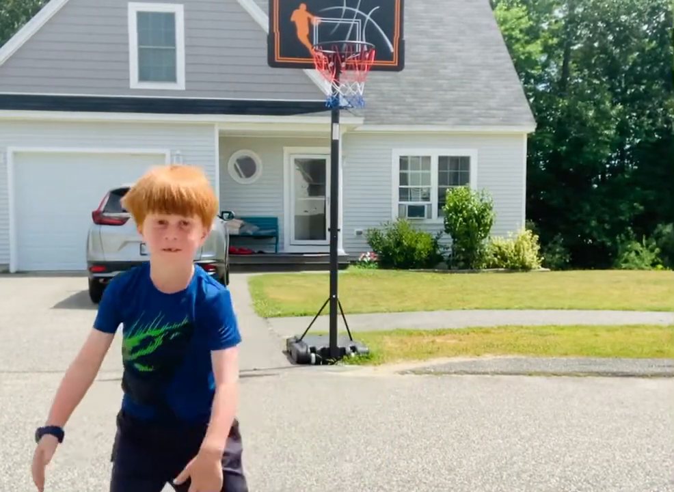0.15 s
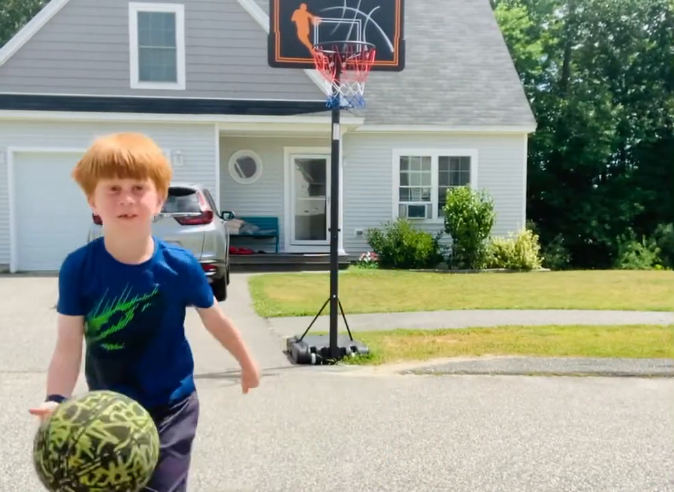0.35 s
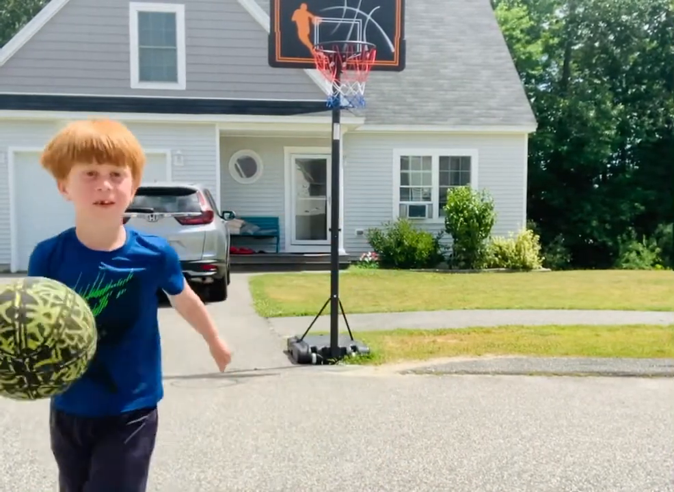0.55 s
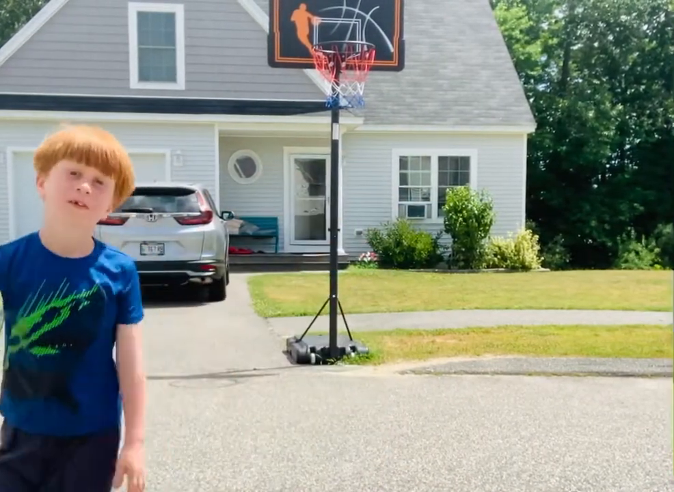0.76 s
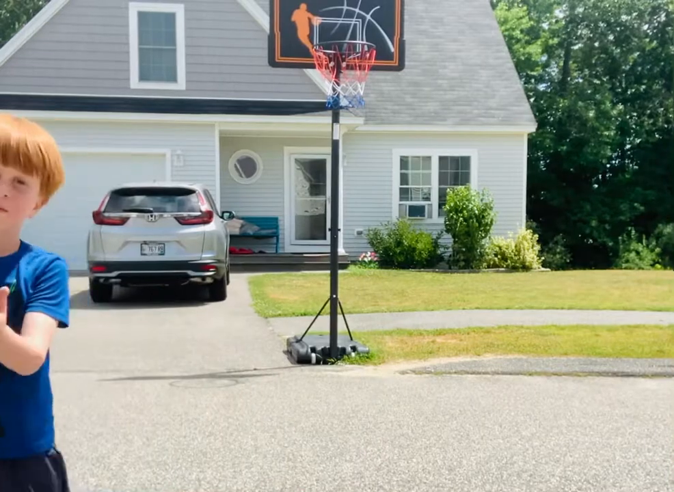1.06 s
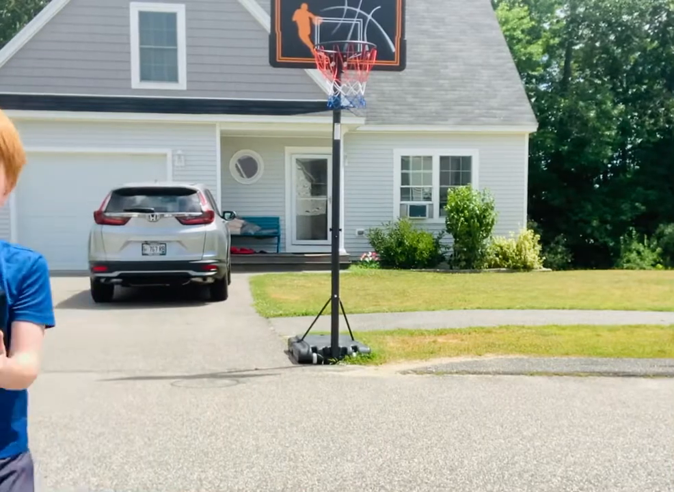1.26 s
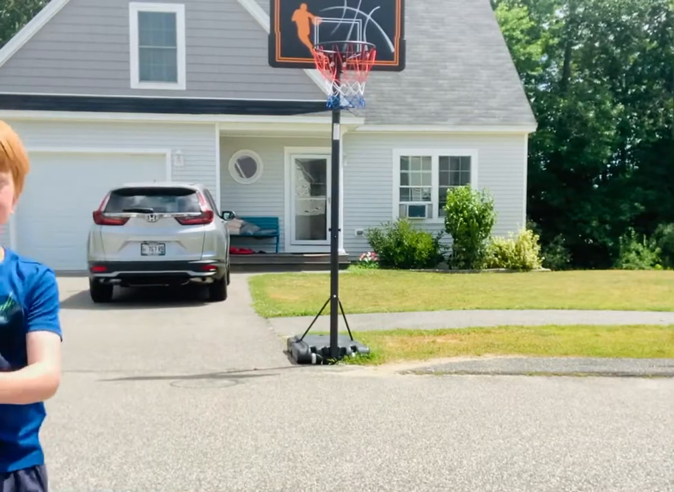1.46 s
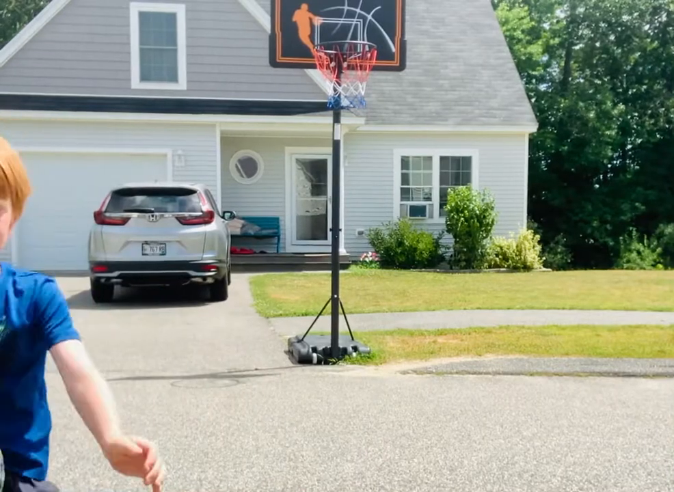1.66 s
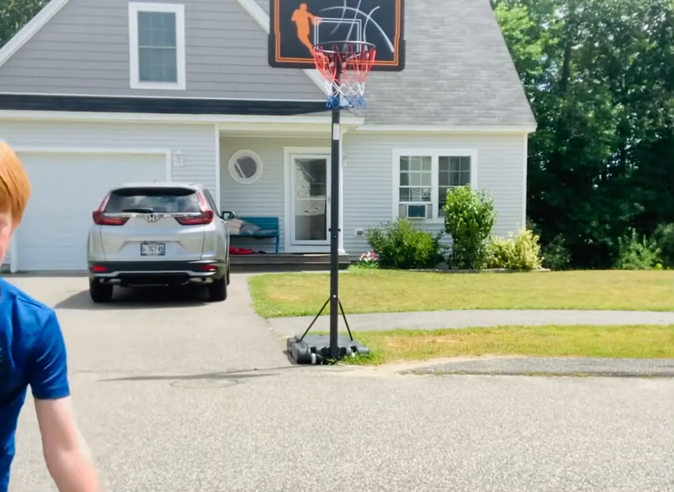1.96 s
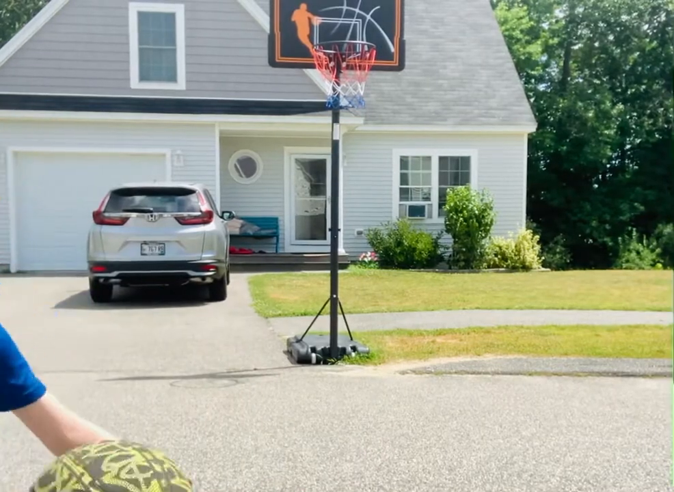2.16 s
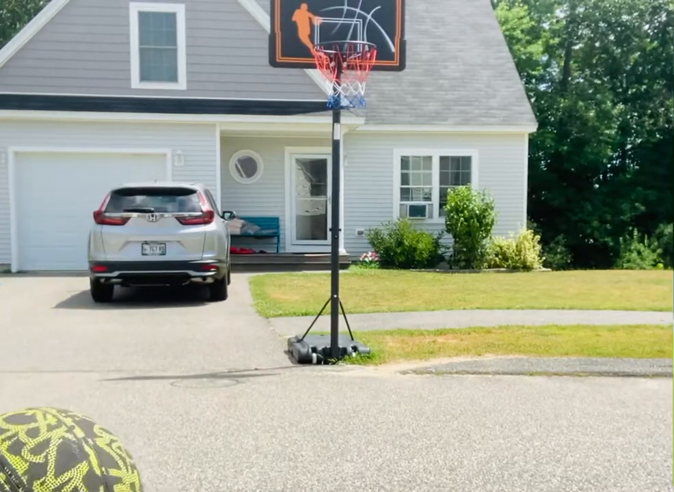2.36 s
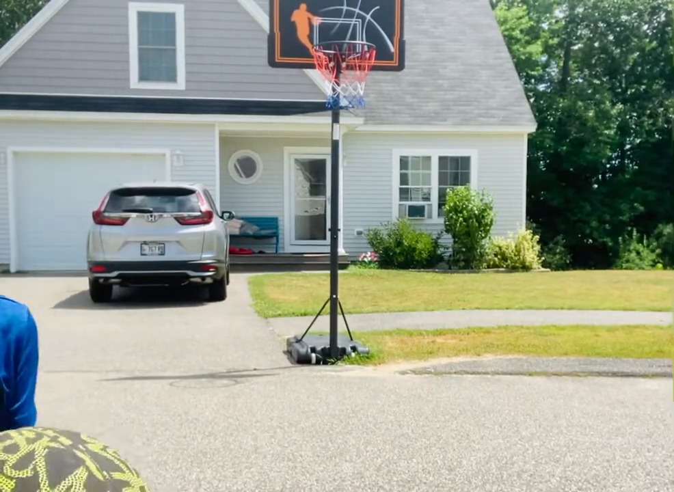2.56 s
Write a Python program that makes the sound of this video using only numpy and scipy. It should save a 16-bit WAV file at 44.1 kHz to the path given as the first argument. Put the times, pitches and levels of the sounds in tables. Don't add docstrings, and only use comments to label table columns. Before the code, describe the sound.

Basketball dribbled close by on outdoor paving: two sharp rubbery smacks, palm slaps, faint birds

```python
import sys
import numpy as np
from scipy import signal
from scipy.fft import rfft, irfft, next_fast_len
from scipy.io import wavfile
from scipy.ndimage import uniform_filter1d

SR = 44100
rng = np.random.default_rng(int(sys.argv[2]) if len(sys.argv) > 2 else 0)


def gain_from_db(level_db):
    decades = np.asarray(level_db, float) / 20
    return 10 ** decades


def inscribe(sig):
    pcm = np.round(np.clip(np.atleast_2d(sig).T, -1, 1) * 32767)
    wavfile.write(sys.argv[1], SR, pcm.astype(np.int16))


N = 119070

# frequency in Hz, density in dB per Hz.
STREET_HZ_DB = [(25, -3), (60, 1), (110, -5), (250, -15.5), (450, -19.5), (1000, -20), (4500, -30),
                (10300, -29.5), (12500, -42)]
# middle in seconds, length in seconds, level in dB, low band in Hz, upper bands in dB.
SCUFFS = [(0.065, 0.033, -52.5, 660, -21), (0.101, 0.024, -42, 900, -25), (0.115, 0.047, -45.5, 2900, -25),
          (0.156, 0.028, -46.5, 1220, -10.5), (0.863, 0.057, -56.5, 2520, -7), (0.904, .03, -59, 2440, -7),
          (1.13, 0.05, -48, 3170, -3), (1.57, 0.04, -48, 2490, 4.5), (1.612, 0.06, -58, 2150, -11),
          (1.99, 0.021, -47.5, 960, -26), (1.994, 0.026, -52.5, 1930, -28), (2.036, 0.055, -56, 930, -8),
          (2.134, 0.015, -45.5, 590, -14), (2.16, 0.023, -56, 537, -25), (2.197, 0.025, -47, 610, -31),
          (0.179, 0.008, -36, 2400, -14), (1.893, 0.01, -40, 2850, -11.5), (2.221, 0.046, -47.5, 2990, 0)]
# frequency in Hz, level in dB.
SCUFF_UPPER_HZ_DB = [(7000, -4), (10300, -2), (13600, -20)]
# start in seconds, level in dB, t60 in seconds, low bands in dB, middle bands in dB.
TAPS = [(0.064, -39, 0.019, 0, 2.5), (.093, -43, 0.032, -4, 1), (.109, -45, .02, -8.5, -8.5),
        (0.1828, -24, 0.0063, -41, -30), (0.1863, -27, 0.042, -40.5, -30), (0.208, -24, 0.0076, -2, -4),
        (0.2111, -20.5, 0.007, -8, -12.5), (.255, -44.5, 0.033, -11, 0), (0.4973, -36.5, 0.038, -20, -12),
        (.505, -40.5, 0.017, -11, -6), (.56, -28, 0.022, -22, -19), (0.567, -41, .01, -5, -6),
        (0.574, -42.5, 0.0082, -1, 1), (0.657, -36, 0.017, -28, -29), (1.0147, -25.5, 0.022, -12, -4.5),
        (1.1273, -17.5, 0.014, -11, -6), (1.1307, -22.5, 0.03, -8.5, -14), (1.3352, -40, 0.06, -5, 3),
        (2.0893, -6, 0.0081, -3, -7), (2.0909, -15, 0.028, 5, 1), (2.0973, -23, 0.0084, 17, 17.5),
        (2.123, -42, 0.03, 2, -10), (2.3977, -22.5, 0.04, -9, -9.5), (2.4018, -17.5, 0.045, -5, 1.5),
        (2.405, -13, 0.015, -11.5, -7.5), (2.416, -36, 0.042, -5, -8), (2.456, -40.5, 0.044, -10, -17),
        (2.666, -31, 0.012, -19, -15), (2.6772, -33, 0.0089, -27, -28), (2.6912, -24.5, 0.0066, -14, -11),
        (2.0929, -20.5, 0.0062, -3, -5), (1.133, -33.5, 0.022, -2.5, -4), (2.161, -47, 0.018, 5.5, -10)]
# centre in Hz, width in Hz, level in dB.
SKIN_BANDS = [(1275, 510, 8), (3000, 370, 3), (3720, 710, 2.8), (7550, 1240, 0.5), (9570, 1080, 3.5),
              (12000, 3800, -8.5)]
# middle in seconds, level in dB, frequency in Hz.
THUMPS = [(.508, -40, 720), (0.563, -43.5, 500), (1.0159, -31.5, 660), (1.0193, -32, 310),
          (1.3362, -34, 650), (1.34, -36, 278), (2.0922, -20.5, 414), (2.0959, -13, 284),
          (2.0998, -6.5, 663), (2.104, -16, 190), (2.1094, -27, 164), (2.651, -39, 197),
          (2.698, -40.5, 605)]
# start in seconds, level in dB, breathing modes in dB.
PALMS = [
    (2.404, -21, -1),
    (1.13, -35, -10.5),
    (2.7, -43, 5),
]
# frequency in Hz, level in dB, t60 in seconds.
HELD_MODES = [(443, 3, 0.12), (454.4, -2.5, 0.13), (577, -8.5, 0.097), (645, -3, 0.087), (707, -3, 0.055),
              (796, -14, .05), (270, -1.5, 0.044), (1114, 5, 0.036), (1193, -14, 0.024), (1393, 0.5, .04),
              (1496, -10, 0.06)]
# start in seconds, smack in dB, smack in Hz, squash in dB, lift-off in dB.
BOUNCES = [
    (0.168, 1, 1670, -9.5, -5),
    (1.88, -6, 1868, -12, 6.5),
]
# frequency in Hz, level in dB over the squash, t60 in seconds.
SMACK_OVERTONES = [(918, -3.5, 0.023), (2030, 8.5, 0.0035), (3380, -1, 0.011), (4570, -10, 0.0059),
                   (5060, -20, 0.0058), (7280, -4, 0.0061), (9160, -23, 0.0085)]
# frequency in Hz, level in dB, t60 in seconds.
CAVITY_MODES = [
    [(421.6, -25, 0.11), (447.7, -26.5, 0.12), (561, -25, 0.077), (880, -34, 0.066), (1056, -32, 0.13),
     (1820, -42, 0.095), (2400, -46.5, 0.27), (2930, -44, 0.092)],
    [(428.2, -18.5, 0.12), (444.2, -24.5, 0.13), (570, -28.5, 0.096), (743, -27, 0.052), (876, -38, 0.039),
     (1082, -34, .17), (1470, -35, 0.06), (2400, -73, 0.35)],
]
# frequency in Hz, level in dB, t60 in seconds.
PING_MODES = [(2396, -44, .6), (3157, -53, 1.2)]
# level in dB, lowpass in Hz.
ECHOES = [(-39, 2500), (-20, 240)]
# start in seconds, length in seconds, start frequency in Hz, level in dB.
CHIRPS = [(.312, .04, 4200, -66), (.552, .028, 4300, -63), (.935, .045, 4600, -65),
          (2.275, .035, 4200, -62), (2.535, .024, 4850, -58), (2.561, .016, 3950, -61),
          (2.672, .018, 4900, -59)]
# start in seconds, length in seconds, frequency in Hz, level in dB.
WHISTLES = [(1.39, .26, 5620, -64), (1.42, .21, 5950, -67), (1.15, .2, 5700, -72), (2.25, .085, 7550, -62),
            (2.61, .02, 1750, -61)]

STREET_DB, GUST_DB = -52.5, 1.43
TICK_DB, TICK_HZ, TICK_T60_S, TICKS_PER_S = -59.5, 9300, 0.036, 45
SCUFF_WIDTH_RATIO, GRIT_DB = 0.38, 3
LOW_HZ, MIDDLE_HZ = 2000, 5000
SNAP_GAIN, TAP_LEAD_S = 3.4, 0.00014
TAP_TAIL_DB, TAP_TAIL_STRETCH = -12.5, 3.33
THUMP_CYCLES = 0.45
RISE_CYCLES = 4
SMACK_SAG_PER_MS, SMACK_RISE_S, SMACK_T60_S = 0.0236, 0.0007, 0.016
CRACK_DB, CRACK_T60_S = -3.5, 0.014
FIRST_DIP_S, DIP_STRETCH = 0.003184, 2.199
SQUASH_PEAK_S, SQUASH_FADE_POWER = 0.011, 2.28
SQUASH_OVERTONE, OVERTONE_LAG_RAD = 0.54, 0.27
FREE_S = 0.009
LIFT_S, LIFT_HZ, LIFT_T60_S, LIFT_RISE_S = 0.0096, 1410, 0.03, 0.00039
PING_WAVER_RAD = 0.03
YARD_DB, YARD_HZ, YARD_T60_S = -39, 1500, 0.25
BOOM_DB, BOOM_HZ, BOOM_T60_S = -37.5, 133, 0.72
YARD_RISE_S, ECHO_S, ECHO_T60_S = 0.022, 0.107, 0.011
CHIRP_FALL_HZ_PER_S = 26000
BIRD_DB, FLUTTER_DB, BIRD_DRIFT_RAD = -4, 4, 0.012
MIC_HZ, TOP_HZ = 75, 15900


def unit(x):
    return x / np.sqrt(np.mean(x ** 2) + 1e-20)


def filtered(x, response):
    m = next_fast_len(x.shape[-1] + 8192)
    spectrum = rfft(x, m) * response(np.fft.rfftfreq(m, 1 / SR))
    return irfft(spectrum, m)[..., :x.shape[-1]]


def peak(f, hz, width_hz):
    return 1j * f * width_hz / (hz * hz - f * f + 1j * f * width_hz)


def add(out, s, x):
    part = out[max(round(s * SR), 0):][:len(x)]
    part += x[:len(part)]


def decay(t, t60_s):
    return gain_from_db(-60 * t / t60_s)


def dying(t, hz, t60_s):
    return decay(t, t60_s) * np.sin(2 * np.pi * hz * t)


def street():
    hz, db = np.transpose(STREET_HZ_DB)
    z = signal.stft(rng.standard_normal(N + 600), nperseg=512)[2]
    patches = uniform_filter1d(rng.standard_normal(z.shape), 8, 0)
    patches = unit(uniform_filter1d(patches, 10, 1))
    gust_db = GUST_DB * patches / (1 + np.arange(len(z))[:, None] / 40)
    noise = signal.istft(z * gain_from_db(gust_db), nperseg=512)[1][:N]
    air = unit(filtered(noise, lambda f: gain_from_db(np.interp(np.log(f + 1), np.log(hz + 1), db))))

    seeds = (rng.random(N) < TICKS_PER_S / SR) * gain_from_db(3.3 * rng.standard_normal(N))
    envelope = signal.fftconvolve(seeds, decay(np.arange(400) / SR, TICK_T60_S))[:N]
    ticks = filtered(envelope * rng.standard_normal(N), lambda f: peak(f, TICK_HZ, 3000))
    return gain_from_db(STREET_DB) * air + gain_from_db(TICK_DB) * ticks


def scuffs():
    out = np.zeros(N)
    t = (np.arange(4000) - 2000) / SR
    for s, length_s, db, low_hz, upper_db in SCUFFS:
        shift = (max(low_hz, 2450) / 2450) ** -0.6

        def bands(f):
            upper = sum(gain_from_db(upper_db + g) * peak(f, hz * shift, 1200) ** 2 for hz, g in SCUFF_UPPER_HZ_DB)
            return peak(f, low_hz, SCUFF_WIDTH_RATIO * low_hz) ** 2 + upper

        noise, grit = rng.standard_normal((2, 4000))
        roughness = gain_from_db(GRIT_DB * unit(uniform_filter1d(grit, 40)))
        rub = unit(filtered(noise * roughness, bands))
        add(out, s - 2000 / SR, gain_from_db(db) * rub * np.exp(-2 * (t / (length_s / 2)) ** 2))
    return out


def ring(t, modes):
    out = 0
    for hz, db, t60_s in modes:
        swell = 1 - np.exp(-(t * hz / RISE_CYCLES) ** 2)
        out = out + gain_from_db(db) * dying(t, hz, t60_s) * swell
    return out


def tap(t, t60_s, low_db, middle_db):
    def skin(f):
        response = 0
        for k, (hz, width_hz, db) in enumerate(SKIN_BANDS):
            tilt_db = low_db if hz < LOW_HZ else middle_db if hz < MIDDLE_HZ else 0
            response = response + (-1) ** k * gain_from_db(db + tilt_db) * peak(f, hz, width_hz)
        return response

    fall = decay(t, t60_s / 3) + gain_from_db(TAP_TAIL_DB - 120 * t / t60_s / TAP_TAIL_STRETCH)
    rustle = np.where(t < 0, np.exp(t / TAP_LEAD_S), fall) * rng.standard_normal(len(t))
    return filtered(rustle + SNAP_GAIN * (t == 0), skin)


def hands():
    out, t = np.zeros(N), np.arange(SR // 2) / SR
    for s, db, breath_db in PALMS:
        breath = gain_from_db(breath_db) * ring(t, HELD_MODES[:2])
        add(out, s, gain_from_db(db) * (breath + ring(t, HELD_MODES[2:])))
    t = t[:2600]
    t_tap = t - 90 / SR
    for s, db, t60_s, low_db, middle_db in TAPS:
        add(out, s + t_tap[0], gain_from_db(db) * tap(t_tap, t60_s, low_db, middle_db))
    for s, db, hz in THUMPS:
        cycles = (t - 0.015) * hz
        push = -np.cos(2 * np.pi * cycles) * np.exp(-(cycles / THUMP_CYCLES) ** 2)
        add(out, s - 0.015, gain_from_db(db) * push)
    return out


def smack(t, hz):
    sagging_hz = hz / (1 + SMACK_SAG_PER_MS * 1e3 * t)
    return dying(t, sagging_hz, SMACK_T60_S) * (1 - np.exp(-t / SMACK_RISE_S))


def overtones(t):
    out = 0
    for k, (hz, db, t60_s) in enumerate(SMACK_OVERTONES):
        out = out + (-1) ** k * gain_from_db(db) * dying(t, hz, t60_s)
    return out * (1 - np.exp(-2 * t / SMACK_RISE_S))


def crack(t):
    noise = rng.standard_normal(len(t))
    noise = filtered(noise, lambda f: peak(f, 2600, 10000) / (1 + (f / 9800) ** 12))
    return gain_from_db(CRACK_DB) * decay(t, CRACK_T60_S) * unit(noise)


def squash(t):
    turn = 2 * np.pi * np.log(t / FIRST_DIP_S) / np.log(DIP_STRETCH)
    u = t / SQUASH_PEAK_S
    wobble = np.cos(turn) + SQUASH_OVERTONE * np.cos(2 * turn - OVERTONE_LAG_RAD)
    envelope = u ** 0.85 * np.exp(-u ** SQUASH_FADE_POWER / 2)
    return -wobble * envelope * (t > FIRST_DIP_S / 2)


def ping():
    t = np.arange(SR) / SR
    waver = PING_WAVER_RAD * np.cumsum(rng.standard_normal((2, SR)), axis=1)
    out = 0
    for (hz, db, t60_s), phase in zip(PING_MODES, waver):
        out = out + gain_from_db(db) * decay(t, t60_s) * np.sin(2 * np.pi * hz * t + phase)
    return out


def lift_off(t):
    return gain_from_db(-22.5) * dying(t, LIFT_HZ, LIFT_T60_S) * (1 - np.exp(-t / LIFT_RISE_S))


def bounces():
    out, t = np.zeros(N), np.arange(1, SR // 2) / SR
    for (s, smack_db, smack_hz, squash_db, lift_db), modes in zip(BOUNCES, CAVITY_MODES):
        add(out, s, gain_from_db(smack_db) * smack(t, smack_hz))
        add(out, s, gain_from_db(squash_db) * (squash(t) + overtones(t) + crack(t)))
        add(out, s, gain_from_db(squash_db) * ping())
        add(out, s + FREE_S, ring(t, modes))
        add(out, s + LIFT_S, gain_from_db(lift_db) * lift_off(t))
    return out


def reverb(x, tail):
    return signal.fftconvolve(x, tail / np.linalg.norm(tail))[:N]


def yard(x):
    t = np.arange(SR // 2) / SR
    tail = filtered(rng.standard_normal(len(t)), lambda f: peak(f, YARD_HZ, 6700))
    tail = tail * decay(t, YARD_T60_S) * (1 - np.exp(-t / YARD_RISE_S))
    boom = filtered(rng.standard_normal(len(t)), lambda f: peak(f, BOOM_HZ, BOOM_HZ))
    boom = boom * decay(t, BOOM_T60_S) * (1 - np.exp(-(t / YARD_RISE_S) ** 2))
    wet = gain_from_db(YARD_DB) * reverb(x, tail) + gain_from_db(BOOM_DB) * reverb(x, boom)
    for db, lowpass_hz in ECHOES:
        smear = rng.standard_normal(500) * decay(np.arange(500) / SR, ECHO_T60_S)
        smear[0] = 4
        echo = filtered(reverb(x, smear), lambda f: 1 / (1 + 1j * f / lowpass_hz) ** 2)
        add(wet, ECHO_S, gain_from_db(db) * echo)
    return wet


def birds():
    out = np.zeros(N)
    for fall_hz_per_s, rows in ((CHIRP_FALL_HZ_PER_S, CHIRPS), (0, WHISTLES)):
        for s, length_s, hz, db in rows:
            t = np.arange(round(length_s * SR)) / SR
            drift = BIRD_DRIFT_RAD * np.cumsum(rng.standard_normal(SR // 2))[:len(t)]
            flutter = unit(uniform_filter1d(rng.standard_normal(SR // 2), 300))[:len(t)]
            level = gain_from_db(db + BIRD_DB + FLUTTER_DB * flutter) * np.sqrt(2 * np.sin(np.pi * t / length_s))
            tone = np.sin(2 * np.pi * (hz - fall_hz_per_s * t / 2) * t + drift)
            add(out, s, level * tone)
    return out


def scene():
    ball = bounces() + hands()
    return (ball + yard(ball) + scuffs() + birds() + street())[None]


def top_cut(x):
    return signal.sosfilt(signal.butter(12, 16670, fs=SR, output="sos"), x)


def record(dry):
    def mic(f):
        highpass = (1j * f) ** 2 / (MIC_HZ ** 2 - f * f + 1.3j * f * MIC_HZ)
        return highpass / (1 + (f / TOP_HZ) ** 70)

    return top_cut(filtered(dry, mic))


dry = scene()
out = record(dry)
inscribe(out)
```